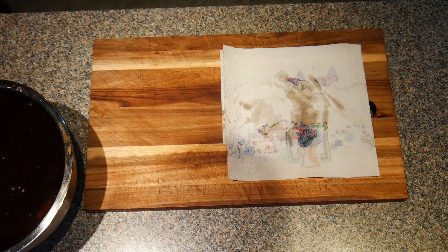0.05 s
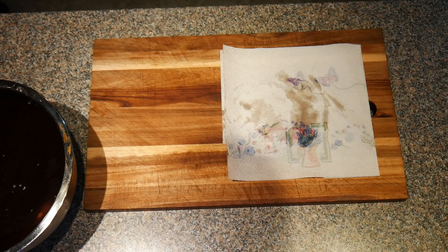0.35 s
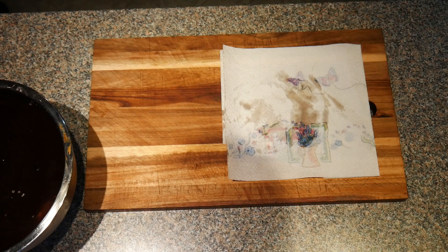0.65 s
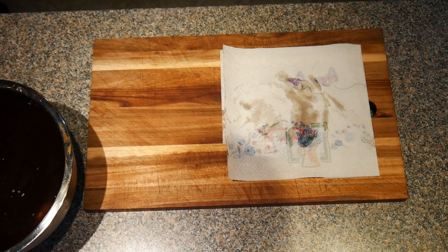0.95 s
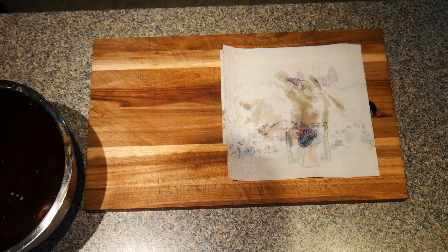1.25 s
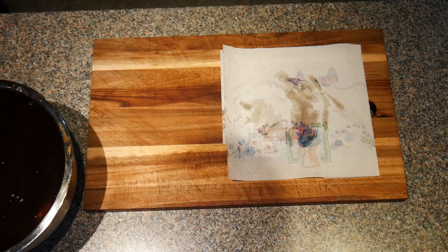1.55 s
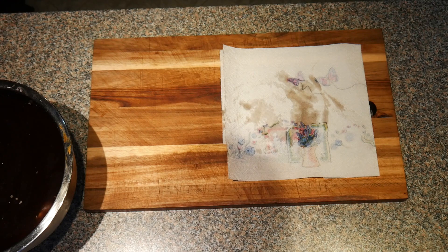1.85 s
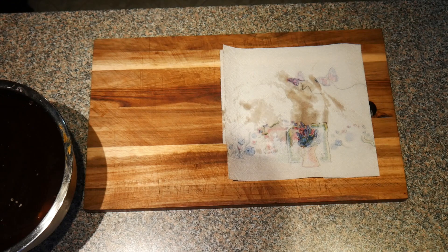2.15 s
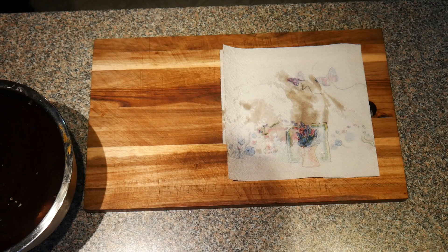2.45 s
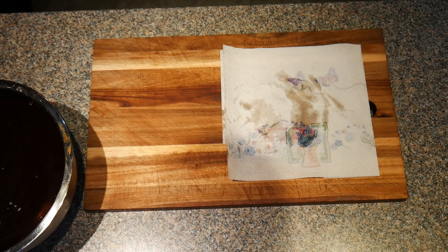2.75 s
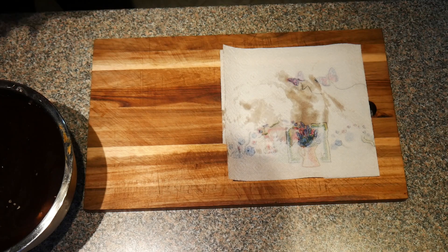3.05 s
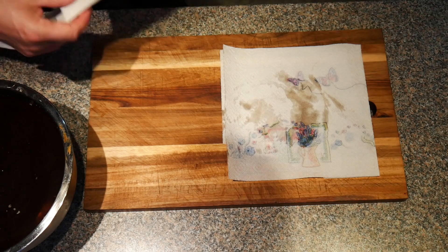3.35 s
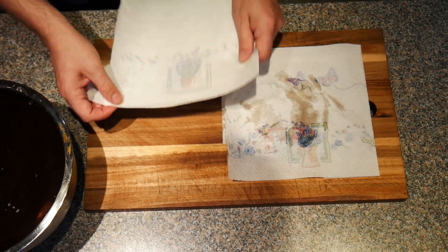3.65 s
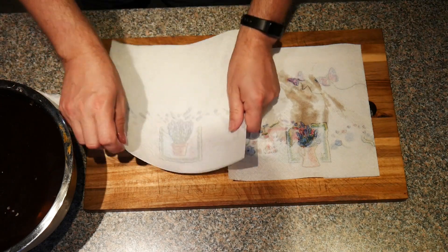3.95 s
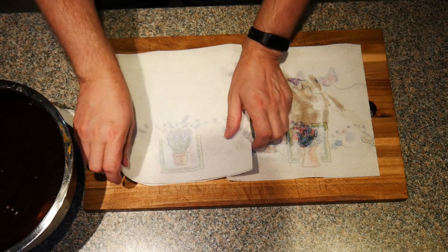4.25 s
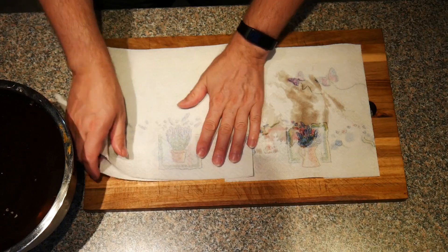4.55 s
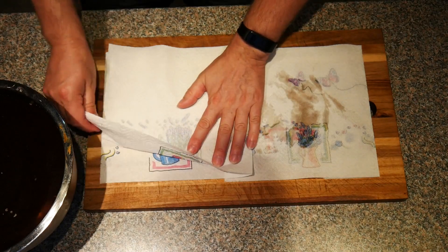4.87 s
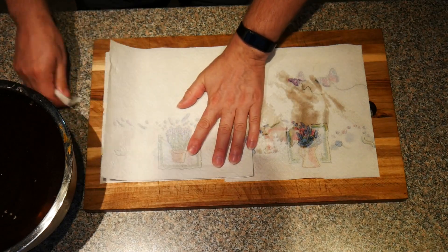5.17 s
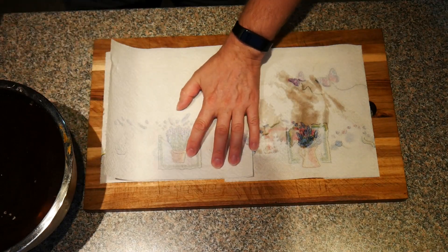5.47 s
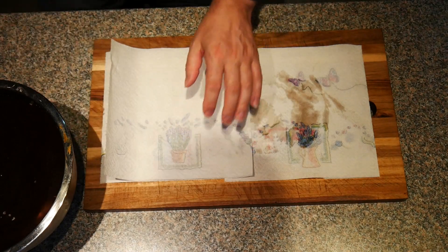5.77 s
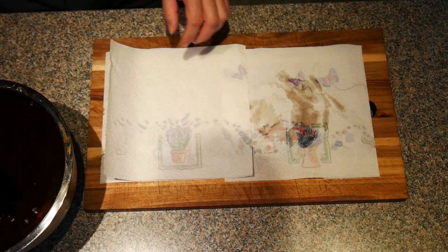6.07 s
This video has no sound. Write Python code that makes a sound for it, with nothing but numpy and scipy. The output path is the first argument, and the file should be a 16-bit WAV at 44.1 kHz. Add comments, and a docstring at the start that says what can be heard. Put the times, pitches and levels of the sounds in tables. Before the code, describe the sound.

A paper towel roll is pulled twice on its holder, at about 0.15 and 0.5 seconds, each pull a rattling judder with rough, high, stuttering squeaks. At 1.2 seconds the holder lands on the counter with a loud knock, rocking and ringing briefly, a little way from the microphone. Between 2.2 and 2.7 seconds a sheet is torn off with a soft, low rasp. Faint rustles and small crinkles continue as it is carried, laid on a wooden board and smoothed, with soft, low puffs of air around 3.5 and 4.6 seconds. At 5 seconds something hard is knocked close by, a sharp clack with tiny rebounds. A few light ticks follow from 5.5 seconds to just after 6. The kitchen is small and quiet, with a short reverberation and a faint, steady, low appliance hum throughout.

```python
"""A roll of paper towel is pulled twice on its holder: stick-slip friction makes it squeak and judder,
then the holder knocks down on the counter and rings in its modes. A sheet is torn off, wafted onto a
wooden board and smoothed, its rubbing fibres radiating a dense train of tiny impulses. Something hard
is knocked nearby and a few small ticks follow. The kitchen is small and quiet, with a short
reverberation and the mains hum of an appliance."""
import sys
import numpy as np
from scipy import signal
from scipy.fft import rfft, irfft, next_fast_len
from scipy.io import wavfile
from scipy.ndimage import uniform_filter1d

SR = 44100
rng = np.random.default_rng(int(sys.argv[2]) if len(sys.argv) > 2 else 0)


def generate_wav(sig):
    """Save sig (samples, or channels by samples) to the path in sys.argv[1] as 16-bit PCM at SR."""
    pcm = np.round(np.clip(np.atleast_2d(sig).T, -1, 1) * 32767).astype(np.int16)
    wavfile.write(sys.argv[1], SR, pcm)


N = 273761
TIME = np.arange(N) / SR

# reverberation time of the kitchen: f/Hz, T60/s
REVERB_TIMES = [(100, 0.97), (500, 0.45), (2000, .46), (4000, 0.44), (8000, 0.41), (15000, 0.2)]
# spectral weight of the difference between the channels: f/Hz, gain/dB
SIDE_SPECTRUM = [(100, -5), (250, 2.5), (700, -8), (2400, -4.5), (4400, 5), (8000, 11), (15000, 10.5)]
# partials of the mains hum: f/Hz, level/dB
HUM_PARTIALS = [(50, -46), (100, -51), (300, -69), (400, -67), (500, -62), (700, -68)]
# noise of the still room: f/Hz, relative level/dB
AIR_SPECTRUM = [(90, -9), (140, -5), (210, -9.5), (300, -7.5), (400, -11.5), (500, -5), (680, -4),
                (800, -12), (1650, -13.5), (2200, -22), (3300, -22), (6000, -33), (15000, -38)]

# the sheet pushes air, the hand presses the board: t/s, level/dB, f/Hz, rise/s, fall/s
AIR_PUFFS = [(3.5, -40.5, 58, .015, .015), (3.567, -38.5, 43.3, 0.03, 0.044), (4.613, -39, 81, 0.0073, .01),
             (4.649, -41.5, 64, 0.015, 0.027)]
# ticks as the hand lifts away: t/s, relative level/dB, T60/s
TICK_CONTACTS = [(5.5345, -0.5, .015), (5.742, -9.5, .02), (5.889, 0, .018), (5.9948, -1.5, .06),
                 (6.048, -2.5, .12)]
# force of a tick: f/Hz, relative level/dB
TICK_SPECTRUM = [(200, -15), (900, -6.5), (1500, -0.5), (2300, -7), (3100, -6.5), (4500, -12),
                 (6000, -26.5), (15000, -40)]
# modes rung by the ticks: f/Hz, bandwidth/Hz, relative gain/dB
TICK_RESONANCES = [(1760, 29, 9.5), (3040, 45, 6.5), (3300, 21, 6)]
# a sharp knock and its bounces: t/s, relative level/dB, T60/s
CLACK_CONTACTS = [(4.9835, -21, .02), (4.9857, -3, 0.029), (4.9922, -23, 0.03), (4.9985, -10.5, 0.0072),
                  (5.015, -16.5, 0.015), (5.0315, -13, 0.0114)]
# sound of the hard object: f/Hz, relative level/dB
CLACK_SPECTRUM = [(40, -33), (90, -11), (140, -1), (210, -8), (350, 0), (700, 1), (850, -4), (1100, 0.5),
                  (2650, -1.5), (3400, -8), (5000, -11), (6800, -19), (9500, -20), (13000, -20.5),
                  (15500, -31)]

# paper is drawn out, carried, laid down and smoothed: peak t/s, level/dB, rise/s, crisp top re rustle/dB
PAPER_STROKES = [(.04, -47.5, 0.08, -16.5), (1.16, -47.5, 0.066, -14), (1.57, -54.5, 0.044, -19),
                 (2.24, -50, .03, -12), (2.315, -50, .03, -14.5), (2.55, -47.5, 0.031, -19),
                 (2.64, -45, 0.047, -15.5), (3.0, -52, .04, -15), (3.27, -50, 0.046, -13),
                 (3.41, -51, 0.037, -11.5), (3.6, -49.5, 0.038, -13.5), (3.73, -55, 0.038, -18),
                 (3.87, -51, 0.042, -13.5), (4.25, -55, 0.038, -13), (4.61, -48.5, .016, -10),
                 (4.81, -47.5, 0.048, -10.5), (4.97, -51, 0.023, -7), (5.61, -54.5, .032, -8)]
# rustle of rubbing paper: f/Hz, relative level/dB
RUSTLE_SPECTRUM = [(150, -18.5), (290, -2), (400, -2.5), (650, 4.5), (900, 1), (1800, 2), (3200, -0.5),
                   (5200, -9), (7000, -19.5), (12000, -33)]
# crisp top from loose fibres: f/Hz, relative level/dB
FIBRE_SPECTRUM = [(3000, -26.5), (6000, 1), (8000, -2.5), (12000, -1.5), (15500, -10)]
# the taut sheet drags on the roll and tears: peak t/s, level/dB, rise/s
SHEET_TUGS = [(1.15, -41, 0.021), (2.32, -54, .05), (2.58, -43, 0.046)]
# low rasp of the taut sheet: f/Hz, relative level/dB
TAUT_SPECTRUM = [(120, -12.5), (280, -10), (400, -3), (600, -1), (900, -11), (1400, -8), (3000, -41)]
# single creases give way: t/s, relative level/dB, T60/s
CREASE_SNAPS = [(2.5351, -6, .09), (3.3118, -7, .06), (3.6626, -8, .06), (4.1935, -8, .012),
                (4.5919, -6, 0.068), (4.7556, 0, .06)]
# snap of a crease: f/Hz, relative level/dB
CREASE_SPECTRUM = [(300, -18.5), (1500, 7), (5000, 1), (7000, -14.5), (15000, -15)]
# the sheet catches on the roll, a finger or an edge: peak t/s, level/dB, f/Hz, rise/s, glide/(Hz/s)
SHEET_CATCHES = [(0.505, -28, 2200, 0.0053, 0), (2.337, -50, 601.4, .007, 0), (3.092, -57, 4020, 0.012, -2),
                 (3.31, -54, 276, 0.014, 0), (3.952, -52.5, 1700, 0.0089, 0),
                 (4.819, -46, 2760, 0.019, -5500)]

# two low thuds of the counter as the holder first lands: t/s, level/dB, f/Hz, T60/s
COUNTER_THUDS = [(1.2185, -4.5, 570, 0.042), (1.2315, -7.5, 454, 0.05)]
# the holder lands and rocks: t/s, relative level/dB, T60/s
LANDING_CONTACTS = [(1.2178, -6.5, 0.035), (1.2212, -3, 0.026), (1.2344, -8.5, 0.021), (1.248, -5, 0.08),
                    (1.277, -12, 0.046), (1.3, -12.5, 0.033), (1.326, -12, 0.019)]
# force of the landing: f/Hz, relative level/dB
LANDING_SPECTRUM = [(40, -41.5), (130, -13.5), (280, -18.5), (360, -10), (430, -6.5), (620, -0.5),
                    (950, -7.5), (1750, -4.5), (2150, -11.5), (3600, -18.5), (6500, -32), (15500, -39.5)]
# normal modes of the holder: f/Hz, bandwidth/Hz, relative gain/dB
HOLDER_MODES = [(410, 14, -3), (508, 10, 0), (579, 24, -6), (699.6, 28, 9.5), (876, 15, 0.5),
                (1070, 53, 7.5), (1602, 20, -5), (1685, 14, -4), (2734, 69, -2.5), (3078, 19, -4),
                (4070, 49, -12), (4800, 41, 0)]
# each pull keeps the roll turning: start t/s, level/dB, hold/s
ROLL_PULLS = [(0.132, -34, 0.22), (0.508, -31.5, 0.089)]
# the core breaks loose: start t/s, level/dB, hold/s, treble tilt/dB
CORE_SLIPS = [(0.152, -13.5, 0.0059, 1.5), (0.173, -21.5, 0.019, 3), (.267, -23, .012, -5.5),
              (0.282, -15, 0.026, -1.5), (0.525, -18, .009, 2), (.602, -14.5, 0.023, -3.5),
              (0.762, -36, 0.013, -0.5)]
# force of the core's jolts: f/Hz, relative level/dB
JUDDER_SPECTRUM = [(40, -36), (100, -14), (140, -2.5), (200, -22.5), (400, -14), (620, -1.5), (900, -5),
                   (1300, -7.5), (2000, -1), (2900, 0), (3700, -13.5), (5600, -20.5), (7000, -33),
                   (15000, -46.5)]
# the roll sticks and sings on its spindle: peak t/s, level/dB, f/Hz, rise/s
SQUEAK_SWELLS = [(0.1478, -10.5, 2754, 0.006), (.202, -16, 2766, .006), (.222, -23, 2775, .005),
                 (.25, -29, 2771, .015), (.295, -20, 2798, .016), (0.527, -15, 2808, 0.0071),
                 (.551, -15.5, 2741, 0.0047), (.586, -22, 2785, .009)]
# rough partials of the squeak: ratio to its frequency, relative level/dB
ROUGH_PARTIALS = [(.25, -14.5), (.5, -24.5), (.75, -20.5), (1.5, -26.5), (1.68, -28), (2, -26), (3, -41),
                  (4, -39)]


def amp(db):
    """Amplitude ratio of a level in decibels."""
    return 10 ** (np.asarray(db) / 20)


def at_hz(points, hz):
    """Interpolation on a logarithmic frequency axis."""
    f, value = np.transpose(points)
    return np.interp(np.log(np.maximum(hz, 1)), np.log(f), value)


def power_sum(gains):
    """Incoherent sources add in power."""
    return np.sqrt(sum(gain ** 2 for gain in gains))


def convolve(x, response):
    """A linear system convolves its input with its impulse response."""
    return signal.fftconvolve(x, response)[:N]


def colour(x, spectrum, size=8192):
    """Minimum-phase filtering by the folded cepstrum; white noise keeps its power."""
    hz = np.arange(size // 2 + 1) * SR / size
    cepstrum = irfft(np.log(amp(at_hz(spectrum, hz))))
    cepstrum[1:size // 2] *= 2
    cepstrum[size // 2 + 1:] = 0
    response = irfft(np.exp(rfft(cepstrum)))
    return convolve(x, response / np.linalg.norm(response))


def drift(per_s):
    """Random modulation of unit rms, linear between independent values."""
    knots = rng.standard_normal(int(N / SR * per_s) + 2)
    curve = np.interp(TIME * per_s, np.arange(len(knots)), knots)
    return curve / np.sqrt(np.mean(curve ** 2) + 1e-20)


def swell(at, rise, fall):
    """Envelope with a rounded peak and exponential flanks."""
    u = (TIME - at) / np.where(TIME < at, rise, fall)
    return np.exp(1 - np.sqrt(1 + np.minimum(u * u, 900)))


def held(start, hold, attack_s, release_s):
    """Envelope that grows exponentially up to the start, holds, then decays."""
    growth = np.minimum((TIME - start) / attack_s, 0)
    decay = np.maximum((TIME - start - hold) / release_s, 0)
    return np.exp(np.maximum(growth - decay, -30))


def grains(per_s, spread_db, even_s):
    """Shot noise: random impulses of uneven size, their power levelled over even_s."""
    sizes = amp(spread_db * np.minimum(rng.exponential(1, N), 4)) * rng.choice([-1, 1], N)
    clicks = sizes * (rng.random(N) < per_s / SR)
    power = uniform_filter1d(clicks ** 2, max(int(even_s * SR), 2))
    return clicks / np.sqrt(np.maximum(power, per_s / SR / 10))


def contacts(rows, rise_s=0.00048, size=4096):
    """Impulsive excitation: each contact is a brief, decaying burst of broadband force."""
    force, t = np.zeros(N + size), TIME[:size]
    for (at, db, t60), noise in zip(rows, rng.standard_normal((len(rows), size))):
        decay = amp(-60 * t / t60)
        whitened = irfft(np.exp(1j * np.angle(rfft(noise * decay))))
        burst = whitened * np.sqrt(decay) * (1 - np.exp(-t / rise_s))
        start = int(at * SR)
        force[start:start + size] += amp(db) * burst / np.linalg.norm(burst)
    return force[:N]


def resonate(force, modes, ring_db):
    """Modal superposition: a body passes the force on and adds one damped oscillation per mode."""
    t, response = TIME[:SR], 0
    for hz, width, db in modes:
        envelope = amp(db) * 2 * np.pi * width / SR * np.exp(-np.pi * width * t)
        response = response + envelope * np.cos(2 * np.pi * hz * t)
    return force + amp(ring_db) * convolve(force, response)


def stereo(mid, side_db):
    """Two close receivers get equal levels with a small phase difference, mostly in the treble."""
    size = next_fast_len(N)
    hz = np.arange(size // 2 + 1) * SR / size
    quadrature = 1j * rfft(mid, size) * amp(side_db + at_hz(SIDE_SPECTRUM, hz))
    side = irfft(quadrature, size)[:N]
    return mid + side * np.array([[1], [-1]])


def kitchen(x, wet_db, side_db, build_s=0.0013, bands=9, smooth_hz=90):
    """Reverberation: direct sound plus a diffuse field that decays at its own rate in each octave."""
    t, centres = TIME[:SR], np.geomspace(62.5, 16000, bands)
    octave = np.log2(np.clip(np.arange(SR // 2 + 1), centres[0], centres[-1]))
    white, tail = rfft(rng.standard_normal(SR)), 0
    for centre in centres:
        band = irfft(white * np.maximum(1 - abs(octave - np.log2(centre)), 0), SR)
        tail = tail + band * amp(-60 * t / at_hz(REVERB_TIMES, centre))
    tail *= (1 - np.exp(-t / build_s)) ** 2
    room = 1 + amp(wet_db) * rfft(tail / np.linalg.norm(tail))
    room /= np.sqrt(uniform_filter1d(abs(room) ** 2, smooth_hz))   # no broad band is favoured
    return stereo(convolve(x, irfft(room, SR)[:SR // 2]), side_db)


def background(air_db=-54.5, rumble_db=-65, hiss_db=-73):
    """Harmonics of the mains frequency over a noise floor of room air, rumble and uncorrelated hiss."""
    hum = sum(np.sqrt(2) * amp(db + .3 * drift(2.1)) * np.sin(2 * np.pi * (hz * TIME + rng.random()))
              for hz, db in HUM_PARTIALS)
    air = colour(rng.standard_normal(N), AIR_SPECTRUM)
    rumble = colour(rng.standard_normal(N), [(25, -3), (110, 6), (170, -9), (1000, -68.5)])
    hiss = np.array([colour(noise, [(200, 6), (2000, 3), (8000, -5.5)])
                     for noise in rng.standard_normal((2, N))])
    return hum + amp(air_db) * air + amp(rumble_db) * rumble + amp(hiss_db) * hiss


def puffs():
    """Volume displacement by the sheet and the hand gives a few slow cycles of air pressure."""
    return sum(np.sqrt(2) * amp(db) * swell(at, rise, fall) * np.cos(2 * np.pi * hz * (TIME - at))
               for at, db, hz, rise, fall in AIR_PUFFS)


def ticks():
    """Light impacts excite the free vibration of a few high modes."""
    force = colour(amp(-24) * contacts(TICK_CONTACTS), TICK_SPECTRUM)
    return kitchen(resonate(force, TICK_RESONANCES, ring_db=5.5), wet_db=-4, side_db=-19)


def clack():
    """A hard impact and its rebounds, so close that direct sound outweighs the diffuse field."""
    impacts = colour(amp(11.5) * contacts(CLACK_CONTACTS), CLACK_SPECTRUM)
    return kitchen(impacts, wet_db=-6.5, side_db=-22.5)


def rasps(relative_width=0.097):
    """Quasi-periodic slips of the sheet make narrow-band noise whose pitch sinks if the sheet slows."""
    sound = 0
    for at, db, hz, rise, glide in SHEET_CATCHES:
        t, band_hz = TIME - at, 2 * relative_width * hz
        phase = 2 * np.pi * (hz + glide * t / 2) * t
        slips = drift(band_hz) * np.sin(phase) + drift(band_hz) * np.cos(phase)
        sound = sound + amp(db) * swell(at, rise, rise) * slips
    return sound


def paper(stir_db=-62.5, stir_crisp_db=-12, wander_db=2.5, stroke_fall_ratio=1.06, tug_fall_ratio=1.47):
    """Friction of fibres is shot noise; tension adds a low rasp, loose fibres a top, creases snaps."""
    # between strokes the held sheet keeps stirring
    stirring = amp(stir_db + wander_db * drift(9)) * held(2.08, 3.4, attack_s=.058, release_s=.058)
    moves = [(amp(db) * swell(at, rise, rise * stroke_fall_ratio), crisp_db)
             for at, db, rise, crisp_db in PAPER_STROKES]
    moves.append((stirring, stir_crisp_db))
    rustle = power_sum(gain for gain, _ in moves)
    crisp = power_sum(gain * amp(crisp_db) for gain, crisp_db in moves)
    drag = power_sum(amp(db) * swell(at, rise, rise * tug_fall_ratio) for at, db, rise in SHEET_TUGS)
    rubbing = grains(per_s=1500, spread_db=1.5, even_s=.04) * amp(1.72 * drift(45))
    sound = rustle * colour(rubbing, RUSTLE_SPECTRUM)
    sound += drag * colour(grains(per_s=1500, spread_db=2.5, even_s=.045), TAUT_SPECTRUM)
    sound += crisp * colour(grains(per_s=5000, spread_db=2.5, even_s=.03), FIBRE_SPECTRUM)
    sound += colour(amp(-19) * contacts(CREASE_SNAPS), CREASE_SPECTRUM)
    return kitchen(sound + rasps(), wet_db=-5.5, side_db=-21)


def counter_thuds():
    """A heavily damped oscillator: the struck counter starts moving within a cycle and soon stops."""
    sound = 0
    for at, db, hz, t60 in COUNTER_THUDS:
        t = np.maximum(TIME - at, 0)
        envelope = amp(db - 60 * np.minimum(t / t60, 4)) * (1 - np.exp(-hz * t))
        sound = sound + envelope * np.sin(2 * np.pi * hz * t)
    return stereo(sound, side_db=-33)


def holder_knock():
    """Impacts ring the holder's modes, far enough off that the diffuse field outweighs direct sound."""
    force = colour(amp(12) * contacts(LANDING_CONTACTS), LANDING_SPECTRUM)
    return kitchen(resonate(force, HOLDER_MODES, ring_db=-4), wet_db=3.5, side_db=-34)


def judder(hinge_hz=1400, turning_tilt_db=2):
    """Forced vibration: the turning core rattles and slips in uneven jolts that drive the holder."""
    turning = [(amp(db) * held(at, hold, attack_s=.025, release_s=.035), turning_tilt_db)
               for at, db, hold in ROLL_PULLS]
    slipping = [(amp(db) * held(at, hold, attack_s=.0016, release_s=.013), tilt)
                for at, db, hold, tilt in CORE_SLIPS]
    bass_gain = power_sum(gain / amp(tilt) for gain, tilt in turning + slipping)
    treble_gain = power_sum(gain * amp(tilt) for gain, tilt in turning + slipping)
    jolts = colour(amp(-0.6) * grains(per_s=1800, spread_db=1, even_s=.008), JUDDER_SPECTRUM)
    bass = signal.sosfilt(signal.butter(1, hinge_hz, fs=SR, output="sos"), jolts)
    force = bass * bass_gain + (jolts - bass) * treble_gain
    return kitchen(resonate(force, HOLDER_MODES, ring_db=-4.5), wet_db=-0.8, side_db=-27.5)


def squeak(waver=.006, jitter_rad=0.68, fall_ratio=.75, roughen_s=.008):
    """Stick-slip friction drives one mode of the spindle; uneven slips add rough partials around it."""
    peak_times, _, hz, _ = np.transpose(SQUEAK_SWELLS)
    envelope = power_sum(amp(db) * swell(at, rise, rise * fall_ratio)
                         for at, db, _, rise in SQUEAK_SWELLS)
    pitch_hz = np.interp(TIME, peak_times, hz) * (1 + waver * drift(300))
    phase = 2 * np.pi * np.cumsum(pitch_hz) / SR
    roughness = np.clip((TIME - peak_times[0]) / roughen_s, .1, 1)   # the first swell starts clean
    tone = np.sin(phase) * (1 + 0.39 * roughness * drift(350))
    for ratio, db in ROUGH_PARTIALS:
        partial = np.sin(ratio * phase + jitter_rad * drift(260))
        tone += roughness * amp(db) * partial * (1 + 0.5 * drift(200))
    tone += amp(-27) * np.sin(2 * phase)
    return kitchen(np.sqrt(2) * envelope * tone, wet_db=-10.5, side_db=-31)


def scene():
    """Superposition: the pressures of all sources in the kitchen add."""
    roll = squeak() + judder() + holder_knock() + counter_thuds()
    return roll + clack() + ticks() + paper() + puffs() + background()


def record(dry, cutoff_hz=15750):
    """Band limiting: an elliptic low-pass filter cuts the top steeply."""
    return signal.sosfilt(signal.ellip(12, .1, 80, cutoff_hz, fs=SR, output="sos"), dry)


dry = scene()
out = record(dry)
generate_wav(out)
```